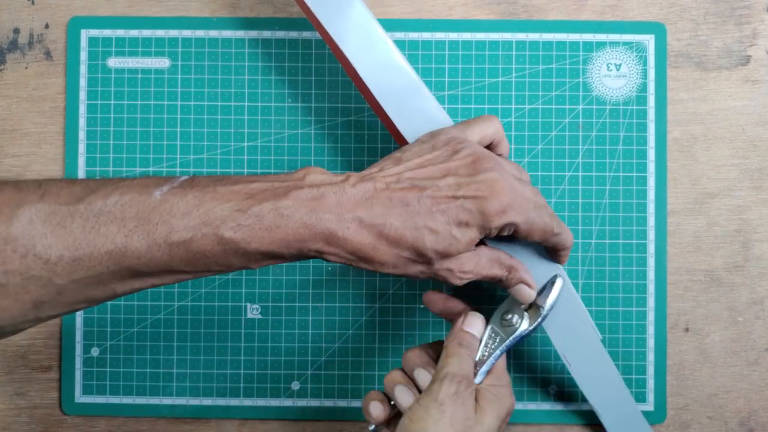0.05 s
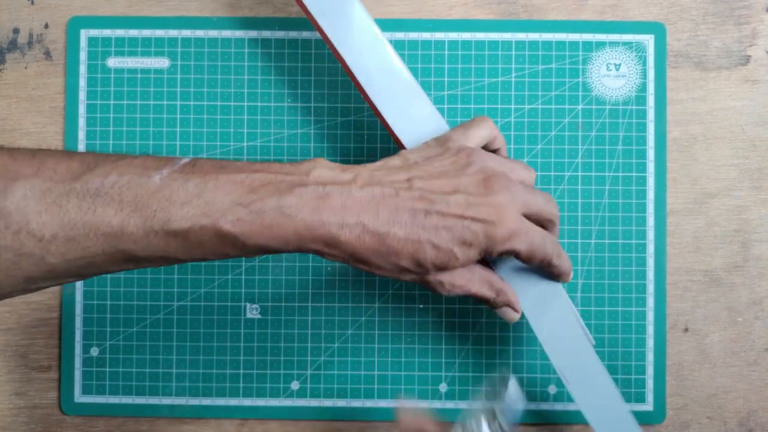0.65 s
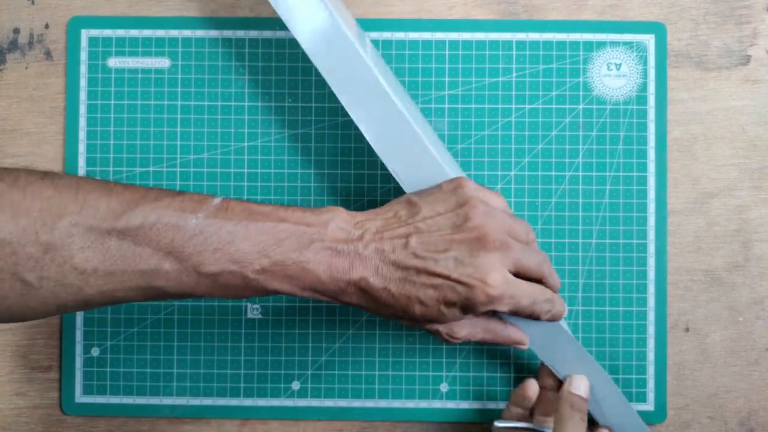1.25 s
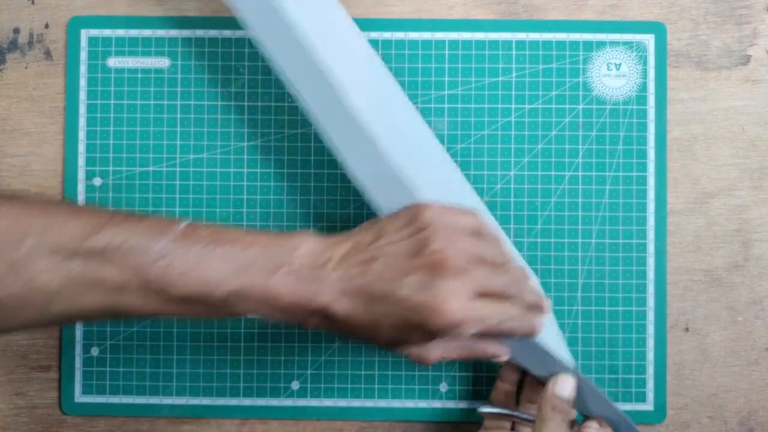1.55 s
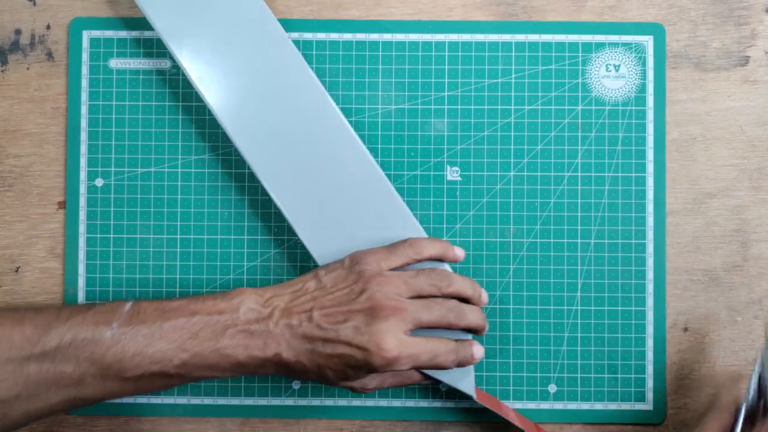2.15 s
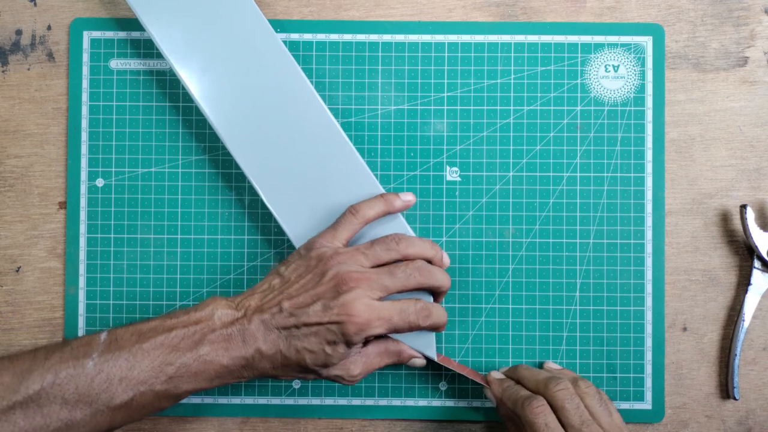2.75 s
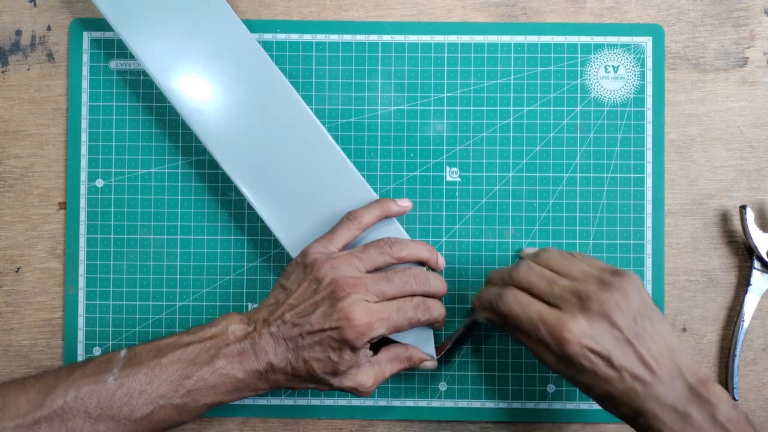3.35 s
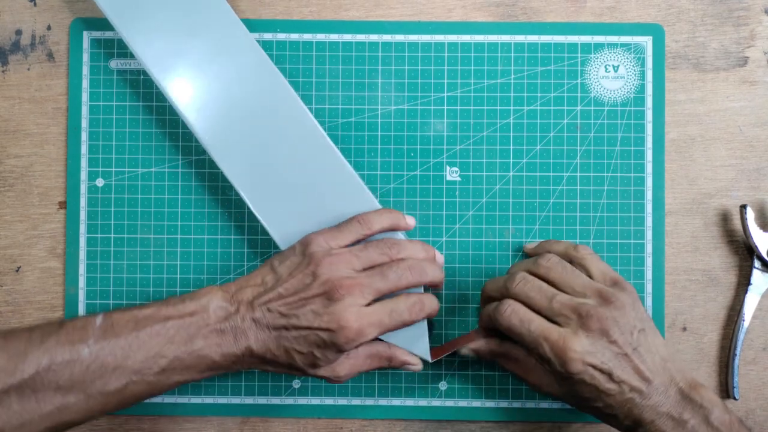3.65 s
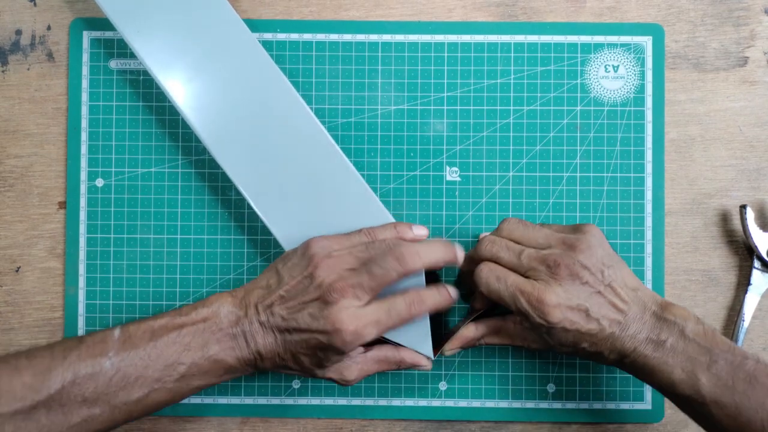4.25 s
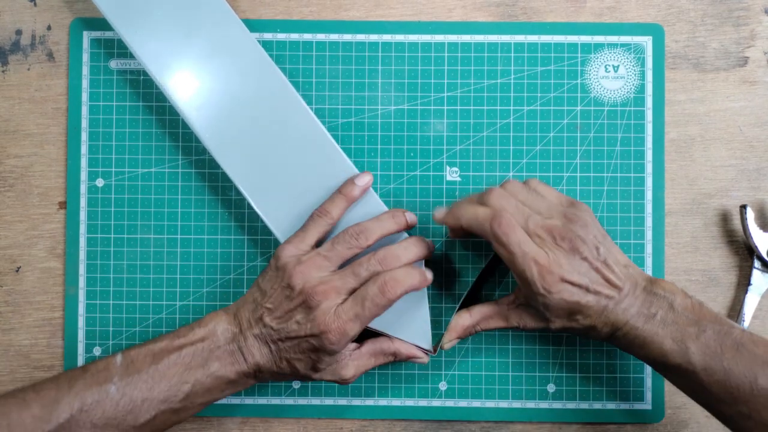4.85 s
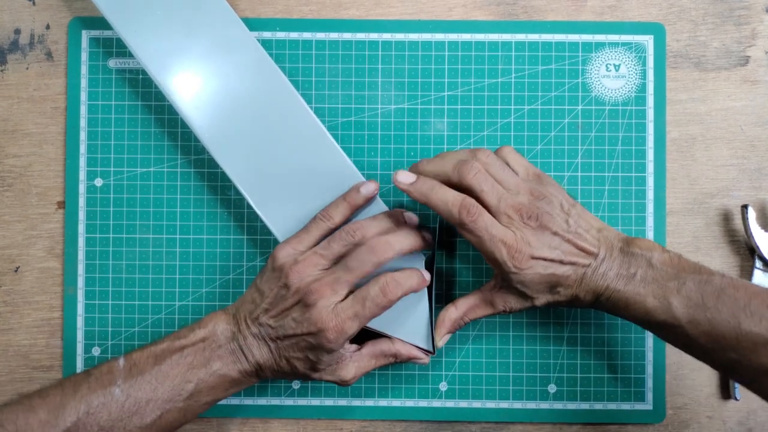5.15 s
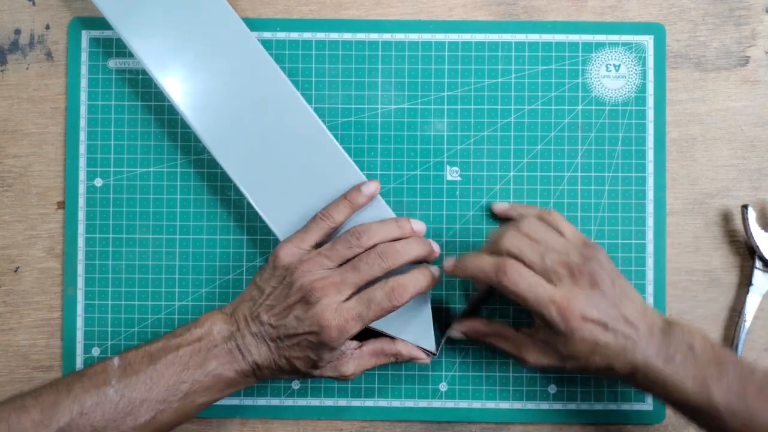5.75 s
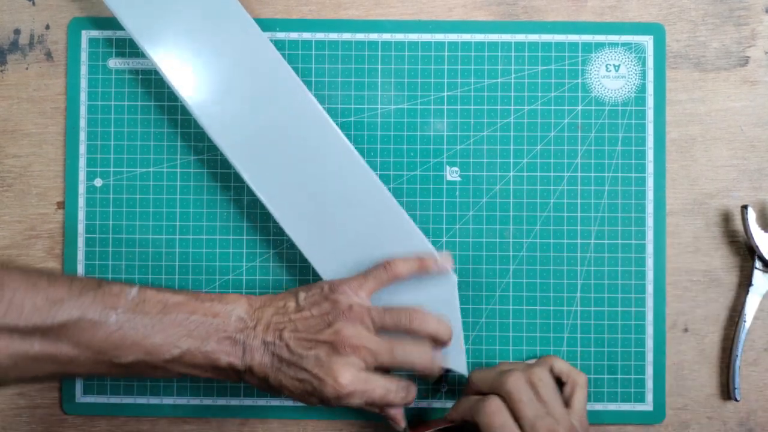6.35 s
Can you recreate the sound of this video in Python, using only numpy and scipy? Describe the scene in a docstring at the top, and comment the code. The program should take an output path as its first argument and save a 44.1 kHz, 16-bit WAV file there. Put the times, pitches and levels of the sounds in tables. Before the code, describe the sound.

A metal strip flops over with a ringing clatter, pliers clink on a bench, then the metal rasps and snaps as it bends.

```python
"""A folded strip of thin sheet metal is bent by hand on a cutting mat in a bare, ringing room.
Impacts excite its modes as it ticks, flops over and snaps at the fold; stick-slip friction makes
its edge rasp and squeal across the mat. Steel pliers, put down on the bench, clink in free vibration.
A turbulent draught buffets the microphone in short puffs, over the room's rush and a faint motor hum."""
import sys
import numpy as np
from scipy import signal
from scipy.fft import rfft, irfft, next_fast_len
from scipy.io import wavfile
from scipy.ndimage import uniform_filter1d

SR = 44100
rng = np.random.default_rng(int(sys.argv[2]) if len(sys.argv) > 2 else 0)


def generate_wav(sig):
    """Save sig (samples, or channels by samples) to the path in sys.argv[1] as 16-bit PCM at SR."""
    pcm = np.round(np.clip(np.atleast_2d(sig).T, -1, 1) * 32767).astype(np.int16)
    wavfile.write(sys.argv[1], SR, pcm)


N = 290390
TIME = np.arange(N) / SR


# resonances of sheet and bench: (frequency [Hz], bandwidth [Hz], lift [dB])
BODY_MODES = [(130.6, 14, 6.5), (249.2, 13, 11.5), (322, 40, 4), (620, 16, 5.5), (686, 39, 3.5),
              (874, 22, 8.5), (1009, 65, 5.5), (1100, 2.3, 10.5), (1215, 11, 5), (1256, 21, 3),
              (1660, 57, 6), (1796, 77, 9.5), (1630, 31, 4), (2520, 52, 6), (3380, 115, 6), (4770, 147, 10),
              (5270, 600, 8.5), (6620, 82, 9)]

def sheet():
    """Source and filter: knocks and drags drive the body's resonances; flop and squeals add to them."""
    return resonate(knocks() + drags(), BODY_MODES) + flop() + squeals()


# knocks, ticks and snaps: (time [s], clang level [dB], thud re clang [dB], crack re clang [dB],
# favoured resonance [Hz], ring length [ratio])
IMPACTS = [(0.001, -27.5, -15, 0, 2240, 0.66), (0.111, -34, -8, -0.5, 3080, 0.71),
           (0.192, -31, 2, 5.5, 2260, 1.34), (0.578, -27.5, 8, 13, 5380, 0.78),
           (0.593, -17, -18, -2, 6640, 0.97), (0.741, -47.5, 10, 15.5, 5690, 1.5),
           (0.925, -25, -25, 1, 3500, .95), (1.135, -25.5, -8.5, 0.5, 1390, .75),
           (1.167, -29, -20, -6, 3450, 0.91), (1.434, -42, -8, 4.5, 1750, .6),
           (1.781, -1, -8.5, -19.5, 1130, 1.07), (1.811, 3, -29, -16, 1800, 1.05),
           (1.847, -6.5, -8.5, -21.5, 1780, 1.04), (1.949, -18, -8.5, -6.5, 1770, 1.54),
           (2.333, -4, -2.5, -4, 5440, 1.17), (2.388, 5, -28, -14, 2360, 0.85),
           (2.467, -15, -9, -3, 880, 0.53), (2.495, -10.5, -27, -7.5, 1720, 1.05),
           (2.699, -36, -0.5, 5.5, 5120, 1.12), (2.742, -28, -20, -9, 1720, 0.63),
           (2.899, -28, -8, 3, 5510, 1), (2.919, -23.5, -6.5, 1.5, 2030, 1.17),
           (3.187, -15, -16, -20, 1640, 0.86), (3.416, -0.5, -12.5, -21.5, 906, 1.4),
           (3.607, -3, -8, -11.5, 745, 1.08), (3.886, -24, -4.5, -26, 1840, 1.22),
           (4.436, -25, -8, -25, 686, 1.16), (4.551, -20, -4, -12, 700, 1.02),
           (4.583, -23.5, -1.5, -27, 690, 2.1), (4.951, -27.5, -21, 0.5, 1200, 1.2),
           (5.383, -21, -6, -7, 820, 0.92), (5.42, -12, -18, -20.5, 1176, 0.77),
           (5.657, -16, -5.5, -0.5, 2080, 1.36), (5.666, -9.5, -6.5, -6, 2210, 1.02),
           (5.675, -11.5, -8, 2.5, 3380, 0.45), (5.962, -12, -5, -4, 1813, 1.22),
           (6.477, -1.5, -29, -30, 1830, 0.79), (6.535, -11, -15, -22, 1790, 1.05)]
# thud, clang, crack and sizzle bands: (frequency [Hz])
IMPACT_BANDS = [400, 1300, 4000, 11000]
# spectral envelope common to all impacts: (frequency [Hz], gain [dB])
IMPACT_SPECTRUM = [(70, -11), (130, 0), (260, -4.5), (520, 0), (1000, -4.5), (1450, -5), (1850, -5.5),
                   (2200, -6), (2900, -5.5), (4000, -4.5), (5000, -9), (6700, -1.5), (8000, -4),
                   (15000, -2.5)]

def knocks(level_db=-7, crack_db=-3, crack_s=0.0034, build_s=0.0009, doubling_db=22.5, grain_db=1.5):
    """Impact excitation: a gritty crack dissolves into the ring; harder contacts are brighter."""
    out, t = np.zeros(N), TIME[:SR]
    grit = rms_one(from_db(grain_db * drift(500)))
    bandwidths_hz = np.array([400, 1400, 5400, 8500])
    band_share_db = 10 * np.log10(bandwidths_hz / (SR / 2))
    crack = 1 + from_db(crack_db) * np.exp(-t / crack_s)
    for s, clang_db, thud_db, hard_db, favoured_hz, length in IMPACTS:
        rise_s = build_s * 2 ** (-hard_db / doubling_db)   # a softer contact builds more slowly
        attack = crack * (1 - np.exp(-t / rise_s))
        blow = (ringing(length) + from_db(-6) * tinny_modes()) * attack
        # the place of contact favours two resonances, one of them by chance
        blow = resonate(blow, [(favoured_hz, favoured_hz / 60, 7), (rng.uniform(2350, 6980), 60, 4)])
        sizzle_db = -9.5 + 1.22 * hard_db   # grows with hardness faster than the crack
        band_db = np.array([thud_db, 0, hard_db, sizzle_db]) - band_share_db
        add(out, s, from_db(clang_db) * colour(blow, np.column_stack([IMPACT_BANDS, band_db])))
    return from_db(level_db) * colour(out * grit, IMPACT_SPECTRUM)


# spectral envelope of the dragging sheet: (frequency [Hz], gain [dB])
FRICTION_SPECTRUM = [(71, -14), (120, -2.5), (204, -8), (241, -2.5), (370, -5.5), (789, -5.5), (874, -11.5),
                     (1340, -14), (1790, -13), (2150, -20.5), (3450, -16.5), (3900, -22.5), (6770, -19.5),
                     (7820, -29.5), (16000, -32.5)]
# growl, rasp and hiss bands: (lower edge [Hz], upper edge [Hz])
FRICTION_BANDS = [(110, 900), (900, 2100), (2100, 16000)]

def drags(growl_db=-7, rasp_db=-4, hiss_db=-6, slips_per_s=1500, uneven_db=3, judder_db=3, lead_s=0.012):
    """Stick-slip friction: each slip of the edge is an impulse that sets the sheet ringing."""
    slips = (rng.random(N) < slips_per_s / SR) * rng.standard_normal(N)
    slips *= from_db(uneven_db * rng.standard_normal(N))
    slips = colour(slips * from_db(judder_db * drift(60)), FRICTION_SPECTRUM)
    out = np.zeros(N)
    for band, level_db, push in zip(FRICTION_BANDS, [growl_db, rasp_db, hiss_db], pushes()):
        part = rms_one(signal.sosfilt(signal.butter(4, band, "band", fs=SR, output="sos"), slips))
        force = np.interp(TIME + lead_s, TIME, push)   # runs ahead of the ring that it builds up
        out += from_db(level_db) * part * force
    return reverberate(out, length=0.52)


# strokes over the mat: (start [s], swell [s], ease [s], peak rasp level [dB], hiss re rasp [dB])
STROKES = [(0.566, .02, 0.021, -27, 0), (3.04, 0.048, 0.18, -43, 1.5), (3.21, 0.14, 0.12, -12, -13),
           (3.5, 0.034, 0.13, -26, -10.5), (3.76, 0.086, 0.214, -46.5, 5), (4.6, 0.085, 0.092, -32, -11.5),
           (4.894, 0.069, 0.064, -34, -6), (5.25, .05, 0.24, -45, -2.5), (5.47, 0.028, .14, -58, 16),
           (6.173, 0.052, 0.2, -34, -5), (6.458, 0.042, 0.14, -21, -7)]

def pushes(swell_db=15, ease_db=13.5, fade_s=0.012, growl_follows=0.87):
    """Amplitude envelopes of growl, rasp and hiss: each drag swells to its hardest push and eases off."""
    gains = np.zeros((3, N))
    for s, swell, ease, peak_db, hiss_db in STROKES:
        db = peak_db - np.interp(TIME - s, [0, swell, swell + ease], [swell_db, 0, ease_db])
        gains += gate(s, swell + ease, fade_s, fade_s) * from_db([growl_follows * db, db, db + hiss_db])
    return gains


# long bending modes of the strip: (frequency [Hz], level [dB], decay time T60 [s])
BENDING_MODES = [(1030, 6.5, 0.22), (1100, 4.5, 0.46), (1158, 4.5, 0.38), (1410, -1, 0.54),
                 (1557, -1.5, 0.58), (1660, 3, 0.52), (1750, 2, 0.52), (1860, 5.5, 0.48),
                 (1996, -0.5, 0.46), (2597, -2.5, 0.32)]

def flop(start_s=1.782, ring_db=-12, slap_db=-19.5, flex_rad=1.0, slap_s=0.0062):
    """Flexural vibration: the face slaps the mat, and further flexing phase-modulates the modes."""
    out, t = np.zeros(N), TIME[:SR]
    for hz, db, t60 in BENDING_MODES:
        phase = 2 * np.pi * (hz * t + rng.random()) + flex_rad * drift(47.2)[:SR]
        add(out, start_s, from_db(ring_db + db - 60 * t / t60) * np.sin(phase))
    burst = rng.standard_normal(SR) * np.exp(-t / slap_s)
    slap = colour(burst, [(300, 24.5), (1500, 7), (4500, 11), (9000, -22)])
    add(out, start_s, from_db(slap_db) * slap)
    return out


# squeals of the edge: (start [s], duration [s], start pitch [Hz], end pitch [Hz], level [dB])
GLIDES = [(0.578, 0.021, 4780, 4840, -27), (3.494, 0.32, 4560, 4120, -40), (4.957, 0.05, 3290, 3260, -36),
          (5.423, 0.257, 3910, 3920, -42.5), (5.658, 0.02, 2066, 2180, -16.5),
          (5.681, 0.0133, 2480, 3370, -9.5), (5.874, 0.032, 680, 587, -34.5)]

def squeals(hoarseness_hz=330, overtone_ratio=1.48, overtone_db=-4, sag_db=4):
    """Friction-induced oscillation: fast, irregular stick-slip draws a hoarse glide from the edge."""
    out = np.zeros(N)
    unsteady = rms_one(drift(2 * hoarseness_hz) + drift(hoarseness_hz))
    for s, length, start_hz, end_hz, db in GLIDES:
        n = int(length * SR)
        phase = 2 * np.pi * np.cumsum(np.linspace(start_hz, end_hz, n)) / SR
        tone = np.sin(phase) + from_db(overtone_db) * np.sin(overtone_ratio * phase)
        envelope = from_db(db - np.linspace(0, sag_db, n)) * signal.windows.tukey(n)
        add(out, s, envelope * tone * unsteady[int(s * SR):][:n])
    return out + reverberate(out, length=0.92)


# damping of sheet and room together: (frequency [Hz], base decay time T60 [s])
DECAY_TIMES = [(120, 0.9), (400, 0.38), (1000, 0.38), (2000, 0.4), (5000, 0.35), (9000, 0.34),
               (15000, 0.15)]

def ringing(length):
    """Modal overlap: dense modes of sheet and room decay like noise in octave bands, treble first."""
    out, t = np.zeros(SR), TIME[:SR]
    spectrum = rfft(rng.standard_normal(SR))
    centres_hz = 125 * 2 ** np.arange(8)
    log_hz = np.log(np.arange(len(spectrum)) + 1)
    for hz, weights in zip(centres_hz, np.eye(len(centres_hz))):
        band = irfft(spectrum * np.interp(log_hz, np.log(centres_hz), weights))
        out += band * np.exp(-np.log(1000) * t / (at_hz(DECAY_TIMES, hz) * length))
    return out


def tinny_modes(count=40):
    """Modal superposition: each point of contact excites its own sparse set of damped treble modes."""
    spread, phase, strength = rng.random((3, count, 1))
    hz = 2000 + 13500 * spread ** 1.3
    t = TIME[:SR // 2]
    waves = strength ** 2 * np.sin(2 * np.pi * (hz * t + phase))
    decay = np.exp(-np.log(1000) * t / at_hz(DECAY_TIMES, hz))
    initial_rms = np.linalg.norm(strength ** 2) / np.sqrt(2)
    return np.pad(np.sum(waves * decay, axis=0) / initial_rms, (0, SR - len(t)))


# clinks of the pliers: (time [s], level [dB], favoured frequency [Hz], ring length [ratio])
PLIER_CONTACTS = [(0.741, -30, 5600, 0.84), (2.333, -19.5, 8350, 2.8), (2.39, -20.5, 9900, 2.7),
                  (2.47, -12, 2010, 1.05), (2.497, -21, 4350, 1.22)]
# modes of their steel: (frequency [Hz], level [dB], base decay time T60 [s])
STEEL_MODES = [(886, 3, .4), (1331, -1, .35), (1834, -3, .35), (2589, -1, .35), (3838, -10, .2),
               (5362, -4, .22), (5510, -2, .33), (8801, -6, .22), (8900, -8, .22), (9320, -13, .26),
               (10407, -8, .28), (10707, -7, .26), (13190, -13, .26), (14308, -9, .2), (14377, -2, .22)]

def pliers(uneven_db=4, rattle_rad=0.8, shimmer=0.31, ring_kept=0.26, fall_db_per_octave=5):
    """Damped free vibration: each clink strikes the modes anew; the loose joint roughens their ring."""
    out, t = np.zeros(N), TIME[:SR]
    hz, mode_db, t60 = np.transpose(STEEL_MODES)[:, :, None]
    rattle = rattle_rad * np.array([drift(115)[:SR] for mode in STEEL_MODES])
    for s, db, favoured_hz, length in PLIER_CONTACTS:
        out[round(s * SR):] *= ring_kept   # touching down damps the earlier ring
        fall_db = fall_db_per_octave * np.abs(np.log2(hz / favoured_hz))
        strength_db = db + mode_db - fall_db + uneven_db * rng.standard_normal(hz.shape)
        phase = 2 * np.pi * (hz * t + rng.random(hz.shape)) + rattle
        envelopes = from_db(strength_db - 60 * t / (t60 * length))
        add(out, s, np.sum(envelopes * np.sin(phase), axis=0))
    return out * (1 + shimmer * drift(150))


# puffs of draught: (start [s], duration [s], level [dB])
GUSTS = [(0.01, 0.089, -29), (0.127, 0.28, -15), (0.427, 0.18, -32.5), (1.317, 0.068, -32),
         (1.48, 0.14, -15.5), (1.643, 0.047, -23), (2.067, 0.25, -23), (3.759, 0.066, -15),
         (4.151, 0.09, -19.5), (5.265, 0.16, -25), (5.379, 0.042, -8), (5.464, 0.16, -16.5),
         (5.746, 0.21, -31), (6.09, 0.068, -21.5), (6.235, 0.21, -19.5), (6.328, 0.053, -13.5)]
# spectral envelope of the turbulence: (frequency [Hz], gain [dB])
TURBULENCE_SPECTRUM = [(15, -46), (25, -52), (54, -25.5), (75, 8), (98, 5.5), (211, -3), (246, -6),
                       (379, -15), (576, -29), (700, -35.5), (910, -107), (1540, -120)]
# thumps of the strongest eddies: (time [s], relative height [ratio])
EDDY_PULSES = [(0.145, 0.67), (0.213, 0.81), (0.3726, 0.78), (1.503, .4), (1.563, 0.78), (2.111, 0.55),
               (3.763, 0.69), (5.495, 0.51), (5.564, 0.4), (6.356, 1)]

def draught(level_db=-2, lumpy_db=5, eddy_db=-3.5, eddy_width_s=0.0016):
    """Turbulent pressure at the microphone port: lumpy puffs, each eddy a push between two suctions."""
    flow = colour(rng.standard_normal(N), TURBULENCE_SPECTRUM)
    # even out the slow swings, so that the puffs set the level
    flow /= np.sqrt(uniform_filter1d(flow ** 2, size=1400) + 1e-20)
    puffs = sum(from_db(db) * gate(s, length, attack_s=0.015, release_s=0.033) for s, length, db in GUSTS)
    out = from_db(level_db) * rms_one(flow * from_db(lumpy_db * drift(45))) * puffs
    for s, height in EDDY_PULSES:
        offset = np.clip((TIME - s) / eddy_width_s, -20, 20)
        out *= 1 - np.exp(-offset ** 2 / 10)   # the eddy displaces the flow around it
        out += from_db(eddy_db) * height * (1 - offset ** 2) * np.exp(-offset ** 2 / 2)
    return out


# spectral envelope of the room's rush: (frequency [Hz], gain [dB])
ROOM_SPECTRUM = [(20, 3), (40, -5), (70, 6), (100, -3), (160, -9), (250, -5), (640, -13), (1750, -15.5),
                 (2250, -23), (6700, -31), (8800, -36), (15800, -42.5)]

def room_rush(level_db=-42, waver_db=1):
    """Broadband ambient noise: a steady rush whose level wavers slightly."""
    gain = from_db(level_db + waver_db * drift(16))
    return gain * rms_one(colour(rng.standard_normal(N), ROOM_SPECTRUM))


# partials of the motor: (frequency [Hz], rms level [dB])
MOTOR_PARTIALS = [(121.5, -49), (241, -65)]

def motor_hum(waver=0.05):
    """Tonal noise: a motor's partials, slowly modulated in amplitude and phase."""
    out = np.zeros(N)
    for hz, db in MOTOR_PARTIALS:
        amplitude = np.sqrt(2) * from_db(db) * (1 + waver * drift(3.1))
        out += amplitude * np.sin(2 * np.pi * hz * TIME + drift(4.9))
    return out


def resonate(x, modes):
    """Resonance: parallel peak filters, given as (frequency [Hz], bandwidth [Hz], lift [dB])."""
    out = x.copy()
    for hz, width, lift_db in modes:
        out += (from_db(lift_db) - 1) * signal.lfilter(*signal.iirpeak(hz, hz / width, fs=SR), x)
    return out


def reverberate(x, length):
    """Convolution with the unit-energy impulse response of sheet and room."""
    ring = ringing(length)
    return signal.fftconvolve(x, ring / np.linalg.norm(ring))[:N]


def colour(x, spectrum):
    """Minimum-phase filtering: folding the cepstrum makes the given dB curve causal."""
    size = 2 * next_fast_len(len(x) // 2 + 2048)
    gain = from_db(at_hz(spectrum, np.fft.rfftfreq(size, 1 / SR)))
    cepstrum = irfft(np.log(gain))
    cepstrum[1:size // 2] *= 2
    cepstrum[size // 2 + 1:] = 0
    return irfft(rfft(x, size) * np.exp(rfft(cepstrum)))[:len(x)]


def at_hz(points, hz):
    """Interpolation on a log-frequency axis."""
    knots_hz, values = np.transpose(points)
    return np.interp(np.log(np.maximum(hz, 1)), np.log(knots_hz), values)


def drift(rate_hz):
    """Random modulation of unit rms."""
    knots = rng.standard_normal(4000)
    return rms_one(np.interp(TIME * rate_hz, np.arange(len(knots)), knots))


def gate(start, length, attack_s, release_s):
    """Trapezoidal envelope: attack, hold and release."""
    return np.interp(TIME - start, [-attack_s, 0, length, length + release_s], [0, 1, 1, 0])


def add(out, s, sound):
    """Superposition of a sound from time s."""
    i = max(round(s * SR), 0)
    out[i:i + len(sound)] += sound[:max(N - i, 0)]


def from_db(db):
    """Amplitude ratio of a level."""
    return 10 ** (np.asarray(db) / 20)


def rms_one(x):
    """Normalisation to unit rms."""
    return x / np.sqrt(np.mean(x ** 2) + 1e-20)


def scene(low_cut_hz=38):
    """Superposition of all sources at one small microphone, which misses the deepest bass."""
    sound = sheet() + pliers() + draught() + room_rush() + motor_hum()
    return signal.sosfilt(signal.butter(2, low_cut_hz, "high", fs=SR, output="sos"), sound)[None]


def record(dry, threshold_db=-2, release_db_per_s=120, attack_s=0.0009, max_peak=0.72, cutoff_hz=15800):
    """Peak limiting: the gain falls a moment late, loud peaks are clipped, and the top treble is cut."""
    over_db = np.maximum(20 * np.log10(np.abs(dry) + 1e-9) - threshold_db, 0)
    release_db = release_db_per_s * TIME
    held_db = np.maximum.accumulate(over_db + release_db, axis=1) - release_db
    lag = np.exp(-1 / (attack_s * SR))
    reduction_db = signal.lfilter([1 - lag], [1, -lag], held_db)
    clipped = np.clip(dry * from_db(-reduction_db), -max_peak, max_peak)
    return signal.sosfilt(signal.ellip(10, .1, 80, cutoff_hz, fs=SR, output="sos"), clipped)


dry = scene()
out = record(dry)
generate_wav(out)
```